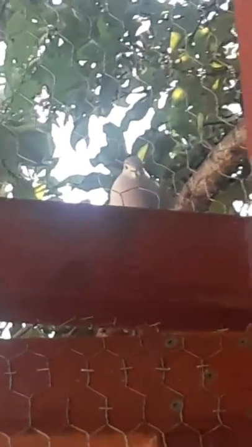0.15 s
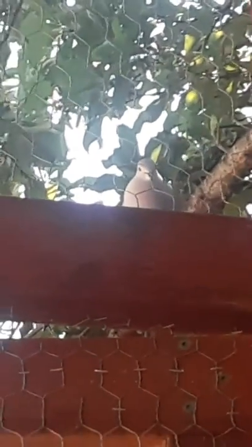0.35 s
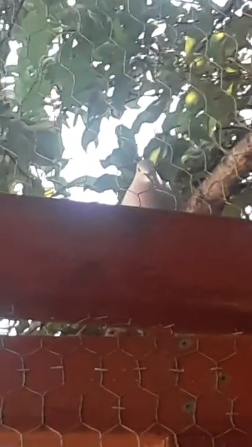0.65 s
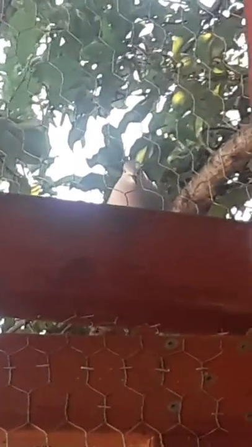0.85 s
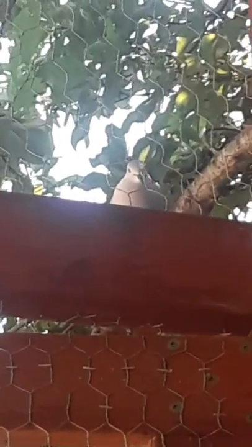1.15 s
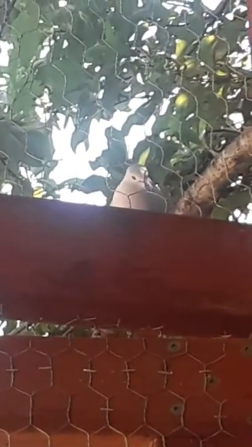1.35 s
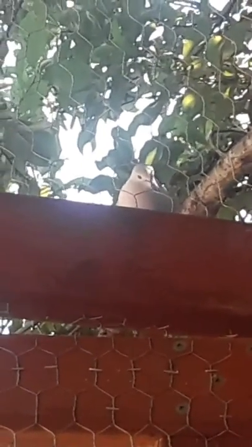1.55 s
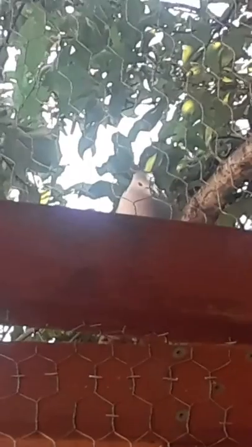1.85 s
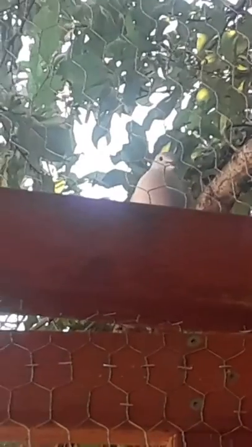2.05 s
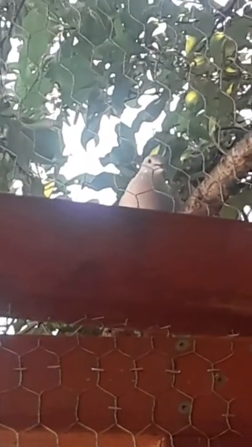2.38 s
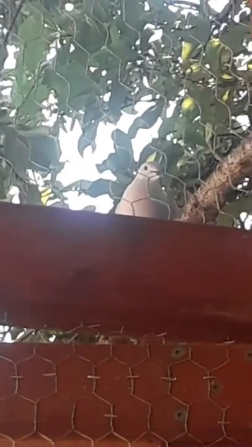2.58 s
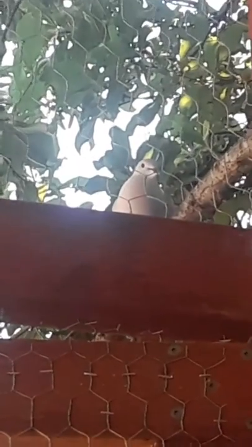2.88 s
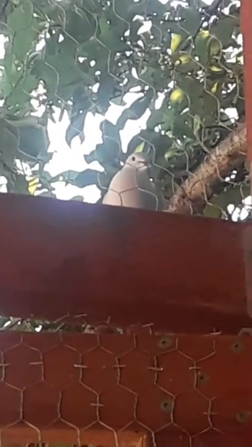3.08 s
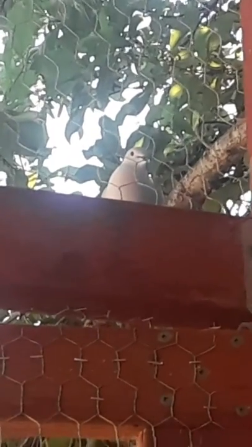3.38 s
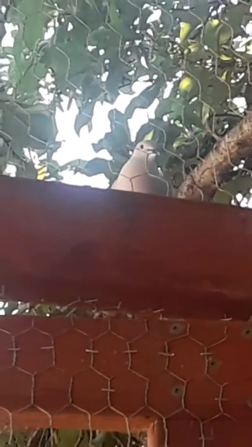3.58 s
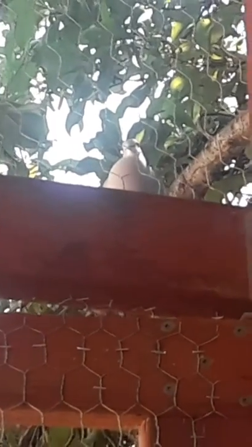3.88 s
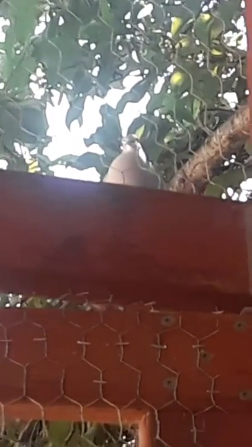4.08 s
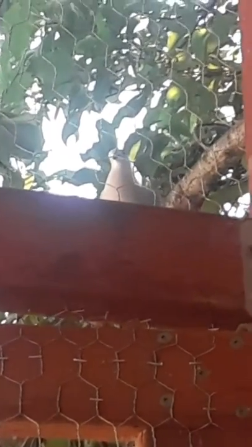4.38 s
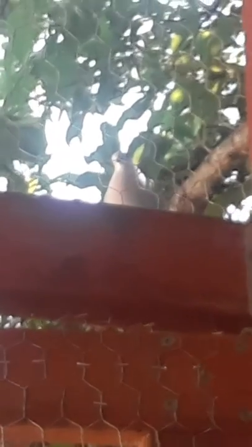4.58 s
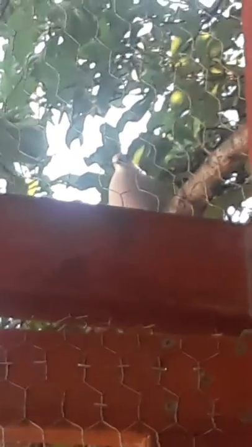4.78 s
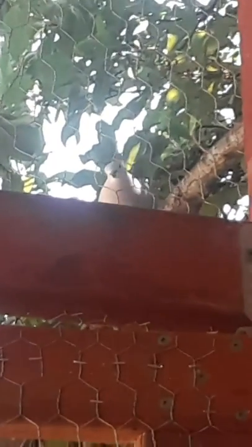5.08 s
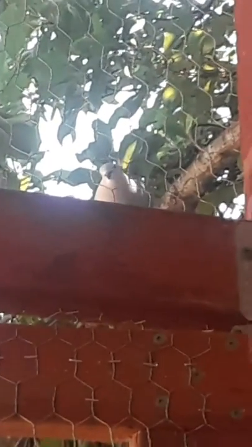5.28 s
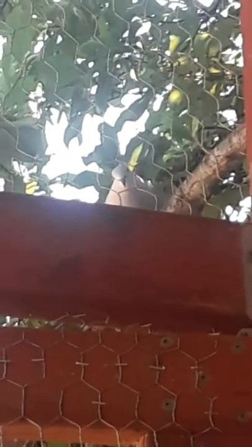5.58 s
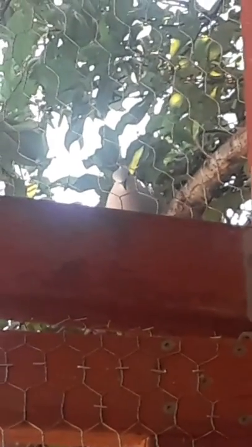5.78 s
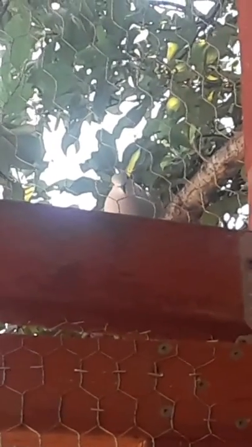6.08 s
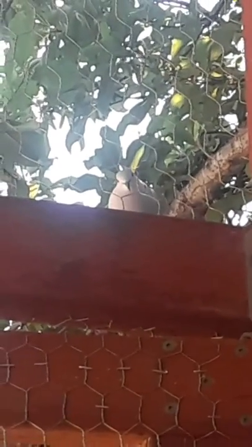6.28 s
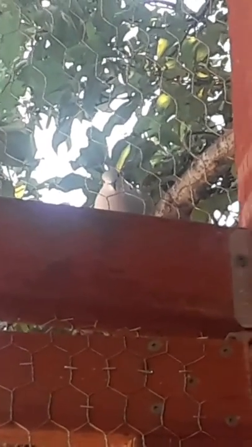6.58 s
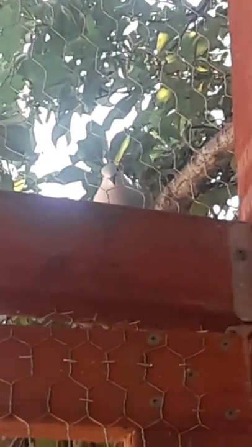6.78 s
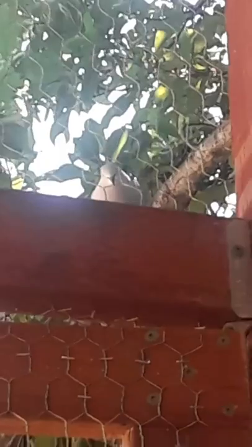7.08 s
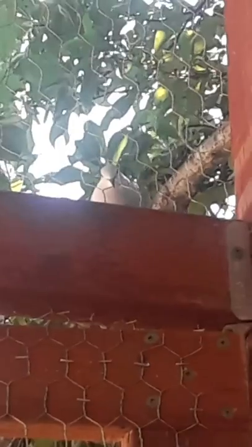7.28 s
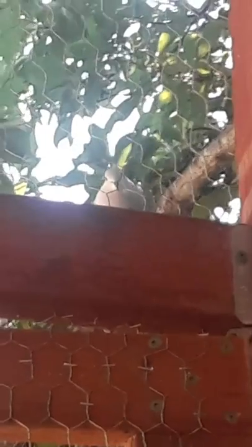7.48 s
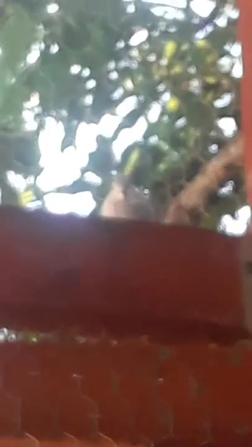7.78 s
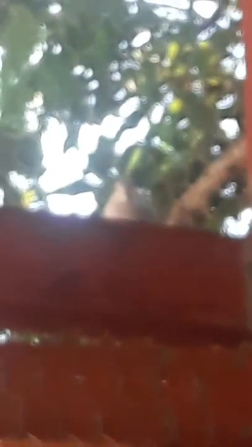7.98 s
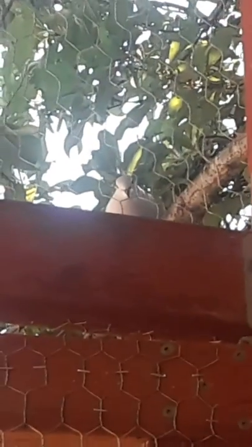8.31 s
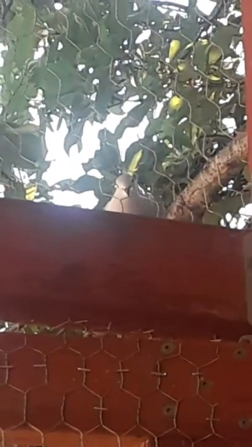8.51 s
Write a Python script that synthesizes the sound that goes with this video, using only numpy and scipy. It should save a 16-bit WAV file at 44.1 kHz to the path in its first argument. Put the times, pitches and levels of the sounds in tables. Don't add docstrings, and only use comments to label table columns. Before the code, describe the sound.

Outdoor yard, stereo microphones close to a perched dove. Its mellow coos dominate, almost flute-smooth, at a steady low pitch. Between the first and second full phrases, thin bird slides, hoarse chirps and far peeps cluster with crisp leaf cracks and a small wood knock. Later it is calmer, with only faint chirps and a soft scuff around the final phrase, over far traffic and faint hiss.

```python
import sys
import numpy as np
from scipy import signal
from scipy.fft import rfft, irfft, next_fast_len
from scipy.io import wavfile
from scipy.ndimage import uniform_filter1d

SR = 44100
rng = np.random.default_rng(int(sys.argv[2]) if len(sys.argv) > 2 else 0)


def boost(x):
    u = np.asarray(x, float) / 20
    return 10 ** u


def unload_wav(signal):
    wavfile.write(
        sys.argv[1],
        SR,
        np.round(np.clip(np.atleast_2d(signal).T, -1, 1) * 32767).astype(np.int16),
    )


N = 381465

# frequency in Hz, density in dB per Hz.
LEAF_COLOUR = [(700, -42.5), (1500, -21.5), (2600, -10), (3600, -11), (5100, -9), (6200, -5), (7600, -2.5),
               (8500, -7), (9800, -17), (12500, -9), (15900, -7.5)]
# start in seconds, peak in dB, ring in Hz, low knock in dB relative.
LEAF_SNAPS = [(1.712, -53.5, 7320, 5), (1.7792, -42.5, 5230, -23), (1.8737, -32, 7240, -28),
              (2.0076, -49, 4700, -14.5), (2.163, -43, 5620, 0), (2.386, -55, 6105, 0),
              (2.4185, -57, 7570, 0), (1.8594, -45, 7600, -20), (2.272, -57, 7000, -10),
              (3.476, -52, 6200, -20), (3.657, -48, 6500, -20), (3.685, -50, 7000, -20),
              (3.7102, -51, 7380, -20), (4.9289, -58, 6230, -20), (3.525, -43, 7000, -20),
              (3.552, -42, 5000, -20), (3.482, -39, 7170, -32), (3.5169, -35, 8500, -31),
              (3.5355, -30, 6420, -8.5), (3.5712, -39, 7450, -6.5), (3.7257, -42, 6830, -22),
              (3.7531, -47, 8340, -22), (3.7668, -51, 7820, -16), (3.7986, -42, 6700, -41),
              (3.8387, -44, 7470, -8), (3.8675, -45, 7010, 8), (4.047, -53, 5870, 7),
              (4.141, -63, 7300, 19), (4.2161, -44, 7670, -18), (4.2883, -39, 13120, -25),
              (4.3332, -56, 14000, -15), (4.2176, -47, 13500, -25), (4.4125, -51.5, 8110, -19),
              (4.8515, -48, 5740, -9), (4.9444, -48, 7600, -18), (3.6459, -44, 7400, -15),
              (3.74, -53, 7800, -20), (4.182, -53, 7900, -20), (4.765, -53, 7500, -20),
              (4.802, -51, 7600, -20), (3.487, -39, 5500, -16), (3.733, -52, 6500, -20),
              (4.262, -52, 7420, -20), (4.7264, -51, 7520, -20), (4.7973, -51, 7100, -20)]
# start and length in seconds, level in dB, pitch in Hz,
# trailing murmur in seconds.
OPENERS = [
    (.904, .182, -19.5, 483.5, .02),
    (5.561, .172, -21.3, 486, .022),
    (7.129, .163, -20.3, 484, .025),
]
HELD = [
    (-.33, .44, -21, 471, .045),
    (1.2, .433, -19.8, 472.5, .058),
    (5.862, .424, -20.5, 477, .025),
    (7.406, .462, -20.8, 469.5, .05),
]
CLOSERS = [
    (.35, .102, -20, 474.6, .028),
    (1.89, .103, -20, 474.5, .028),
    (6.533, .115, -20, 476.7, .035),
    (8.119, .102, -20.5, 471.3, .028),
]
LEAD_S = 0.04


def evened(x):
    return x / np.sqrt(np.mean(x ** 2) + 1e-20)


def read(points, hz):
    f, value = np.transpose(points)
    return np.interp(np.log(hz + 1), np.log(f + 1), value)


def coloured(x, points):
    count = next_fast_len(len(x) + len(x) % 2, True)
    gain = boost(read(points, np.fft.rfftfreq(count, 1 / SR)))
    return irfft(rfft(x, count) * gain, count)[:len(x)]


def add(mix, s, sound):
    first = round(s * SR)
    part, sound = mix[max(first, 0):], sound[max(-first, 0):]
    part[:len(sound)] += sound[:len(part)]


def wander(count, ms):
    span = max(int(ms * SR / 1000), 1)
    once = uniform_filter1d(rng.standard_normal(count), span)
    return evened(uniform_filter1d(once, span))


def fuzzy(hz, width_hz):
    r = np.exp(-np.pi * width_hz / SR)
    z = rng.standard_normal(len(hz)) + 1j * rng.standard_normal(len(hz))
    z = signal.lfilter([1], [1, -2 * r, r * r], z)
    return evened((z * np.exp(2j * np.pi * np.cumsum(hz) / SR)).real)


def edges(count, ms):
    return signal.windows.tukey(count, min(2 * ms * SR / 1000 / count, 1))


def eased(u):
    return np.sin(np.pi / 2 * np.clip(u, 0, 1)) ** 1.3


def yard():
    # frequency in Hz, density in dB per Hz.
    hum_colour = [(15, -59), (25, -25.5), (90, -1.5), (262, -4), (342, -7), (466, -5.5), (582, -7),
                  (636, -7), (1160, -10.5), (1580, -17.5), (1970, -21), (2810, -28), (5000, -41),
                  (6500, -67.5), (11000, -120)]
    # frequency in Hz, share in common from 0 to 1.
    likeness = [(40, .999), (150, .995), (700, .99), (2000, .96), (5000, .93)]
    # peak in seconds, half width in seconds, gain in dB.
    hum_swells = [(.15, .3, 3), (1.4, 0.65, 4), (3.9, .5, 2.5), (5.9, .45, 3.5), (7.7, 0.58, 4.5)]
    frames, hz = N // 256 + 5, np.fft.rfftfreq(1024, 1 / SR)
    a, b, c, d, patches = rng.standard_normal((frames, 513, 5)).T
    patches = evened(uniform_filter1d(uniform_filter1d(patches, 12, 0), 14, 1))
    t = np.arange(frames) * 256 / SR
    swell = sum(db * np.exp(-((t - s) / width) ** 2) for s, width, db in hum_swells)
    same = np.clip(read(likeness, hz), -1, 1)[:, None]
    left = a + 1j * b
    right = same * left + np.sqrt(1 - same ** 2) * (c + 1j * d)
    z = np.array([left, right]) * boost(read(hum_colour, hz)[:, None] + 1.1 * patches + swell)
    return boost(-56) * evened(signal.istft(z, nperseg=1024, noverlap=768)[1][:, :N])


def echoes(x, t60, scatter_db):
    # delay in seconds, level in dB.
    walls = [
        (.035, -30),
        (.094, -27.5),
        (.135, -38),
    ]
    count = SR // 2
    t = np.arange(count) / SR
    sparse = rng.choice([-1., 1.], count) * (rng.random(count) < 1500 / SR)
    tail = sparse * boost(-60 * t / t60) * (t > .012)
    other = rng.standard_normal((2, count)) * np.abs(tail)
    taps = boost(scatter_db) * (tail + .4 * other) / np.linalg.norm(tail)
    for delay, db in walls:
        taps[:, int(delay * SR)] += boost(db)
    return signal.oaconvolve(x[None], taps, axes=1)[:, :N]


def scuffs():
    # start and length in seconds, top in Hz, level in dB.
    rubs = [ (3.866, 0.03, 3000, -47), (3.865, .03, 900, -48), (1.9, .15, 750, -57),
            (4.038, 0.09, 4500, -56), (6.268, 0.2, 6580, -66.5), (7.527, 0.039, 6000, -60.5),
            (7.549, 0.035, 5500, -51), (7.561, 0.1, 5030, -59.5), (8.121, 0.27, 4300, -63), ]
    # start in seconds, peak in dB, pitch in Hz, decay in seconds.
    s, db, hz, decay = (3.8662, -31, 750, .0022)
    out = np.zeros(N)
    t = np.arange(1800) / SR
    add(out, s, boost(db) * np.exp(-t / decay) * np.sin(2 * np.pi * hz * t))
    for s, length, top_hz, db in rubs:
        dull = [(.05 * top_hz, -12), (.25 * top_hz, 0), (.8 * top_hz, -8), (1.8 * top_hz, -35)]
        noise = evened(coloured(rng.standard_normal(int(length * SR)), dull))
        u = np.linspace(0, 5, len(noise))
        add(out, s, boost(db) * noise * np.e * u * np.exp(-u) * edges(len(noise), ms=0.95))
    return out


def snaps():
    out, ticks = np.zeros((2, N))
    t = np.arange(1800) / SR
    for s, db, ring_hz, knock_db in LEAF_SNAPS:
        add(ticks, s, boost(db + 14) * np.ones(1))
        add(out, s, boost(db - 3) * np.exp(-t / .0006) * np.sin(2 * np.pi * ring_hz * t))
        knock = fuzzy(np.full(len(t), 1600), width_hz=1200)
        add(out, s, boost(db + knock_db - 10.5) * np.exp(-t / 0.01) * knock)
    return out + coloured(ticks, LEAF_COLOUR)


def stirring():
    # peak in seconds, rise and fall in seconds (20 dB each), level in dB.
    stirs = [ (1.72, .01, .06, -61), (1.778, .03, .07, -66), (1.866, .012, .07, -57), (1.92, .04, .16, -72),
             (2.162, .007, .08, -66), (2.2, .03, .3, -77), (2.388, .008, .1, -71),
             (3.482, 0.0097, 0.18, -63), (3.58, .095, 0.051, -50), (3.64, .06, .12, -66),
             (3.8, .12, 0.04, -63), (3.872, .008, .1, -63), (4.058, .06, .09, -67), (4.15, .02, .2, -72),
             (4.37, .1, .1, -79), (4.56, .2, .3, -84), (4.222, .08, .055, -64.5), (4.262, .015, 0.09, -69),
             (4.414, .012, .07, -64), (4.47, .06, .04, -68), (4.74, .03, .12, -65),
             (4.805, .07, 0.027, -64), (4.854, .05, 0.09, -66), (4.942, 0.03, .03, -69),
             (4.97, .02, .4, -78), ]
    stir = np.zeros(N)
    for s, rise, fall, db in stirs:
        t = np.arange(-rise, 2 * fall, 1 / SR)
        add(stir, s - rise, boost(db - 20 * np.maximum(-t / rise, t / fall)))
    t = np.arange(1800) / SR
    for s, db, _, _ in LEAF_SNAPS:
        add(stir, s, boost(db - 38) * np.exp(-t / .008))
    return stir


def crackle():
    size = boost(2.1 * np.minimum(rng.exponential(1, N), 4))
    cracks = rng.standard_normal(N) * size * (rng.random(N) < 2500 / SR)
    cracks = evened(cracks) + 1.4 * rng.standard_normal(N)
    cracks = evened(coloured(cracks, LEAF_COLOUR))
    clumped = np.zeros(N)
    for side in "high", "low":
        split = signal.butter(4, 9800, side, fs=SR, output="sos")
        clumped += signal.sosfilt(split, cracks) * boost(1.8 * wander(N, ms=6.))
    return clumped


def leaves():
    return snaps() + scuffs() + boost(3.7) * crackle() * stirring()


def whistles():
    # start and length in seconds, start and end pitch in Hz, level in dB.
    even_slides = [ (0., .17, 5615, 5575, -68.5), (.118, 0.08, 5050, 4980, -61),
                   (0.135, 0.05, 5370, 5260, -62), (.255, .3, 4850, 4215, -57), (.2, .07, 4900, 4860, -68),
                   (.168, .035, 4930, 4900, -57), (.14, .03, 5650, 5550, -67), (.03, .05, 4600, 4600, -74),
                   (3.015, .115, 3130, 2600, -59), (2.935, .045, 2850, 2560, -61),
                   (4.1, .055, 2260, 2240, -58), (4.115, .06, 1540, 1720, -64), (4.46, .1, 2330, 2290, -62),
                   (1.842, 0.055, 1860, 1890, -51.5), (1.89, .06, 1900, 1900, -61),
                   (3.548, .075, 1870, 1990, -48), (2.835, .175, 3870, 4020, -61),
                   (2.775, .068, 4080, 3830, -60), (2.908, .26, 5570, 4760, -63),
                   (4.44, 0.15, 3790, 3745, -73), (4.567, .065, 5080, 4450, -57.5),
                   (4.52, .04, 5120, 5060, -62), (7.095, .12, 5490, 5480, -65),
                   (7.16, .31, 5490, 5270, -63), (8.182, .18, 4080, 4040, -76), ]
    # start and length in seconds, start and end pitch in Hz, level in dB.
    swoops = [ (3.897, .04, 3600, 2380, -49), (3.887, .022, 3500, 3480, -47), (4.5, .035, 5650, 5120, -66),
              (4.825, .13, 3100, 4900, -70), (4.82, .05, 5500, 5750, -68), (7.095, .06, 4650, 4150, -65),
              (7.14, .33, 4170, 3800, -69), (3.812, .04, 3100, 2350, -57), (3.772, .014, 3000, 2900, -58), ]
    out = np.zeros(N)
    for calls, settle in (even_slides, 1.1), (swoops, 3.2):
        for s, length, from_hz, to_hz, db in calls:
            u = np.linspace(0, 1, int(length * SR))
            hz = from_hz + (to_hz - from_hz) * (1 - np.exp(-settle * u)) / (1 - np.exp(-settle))
            swell = (.12 + .88 * eased(u / 0.4)) * boost(db - 9 * u ** 2)
            tone = np.sqrt(2) * np.sin(2 * np.pi * np.cumsum(hz) / SR) + 0.25 * fuzzy(hz, 220)
            flutter = boost(1.6 * wander(len(hz), ms=9.))
            add(out, s, swell * flutter * tone * edges(len(hz), ms=5.))
    return out


def arched_whistle():
    # time in seconds, pitch in Hz, level in dB.
    course = [(4.835, 2633, -68), (4.897, 3372, -51), (4.999, 3701, -72), (5.041, 3916, -54),
              (5.073, 3910, -50), (5.101, 3752, -59), (5.127, 3389, -62), (5.169, 3237, -60),
              (5.25, 3172, -80)]
    s, hz, db = np.transpose(course)
    t = np.arange(s[0], s[-1], 1 / SR)
    hz = uniform_filter1d(np.interp(t, s, hz), size=1100)
    tone = np.sqrt(2) * np.sin(2 * np.pi * np.cumsum(hz) / SR) + .3 * fuzzy(hz, 200)
    return s[0], tone * boost(np.interp(t, s, db) - .5 + 2.0 * wander(len(t), ms=9.))


def chirps():
    # start
    # and length in seconds, start and end pitch in Hz, level in dB.
    tweets = [ (2.77, .1, 4350, 3930, -64), (2.83, 0.042, 2650, 2570, -60), (2.916, 0.09, 2930, 2540, -61),
              (3.015, .12, 3200, 2700, -65), (4.86, .12, 3000, 3650, -60), (3.268, 0.09, 3600, 3550, -62),
              (3.252, .1, 4150, 4200, -67), (3.292, .03, 4900, 4600, -68), (4.835, .09, 2230, 2330, -52),
              (3.457, .11, 1575, 1920, -61.5), (3.538, 0.083, 1822, 2010, -52),
              (3.645, .055, 5600, 3900, -64), (3.782, .03, 6150, 6100, -64), (3.76, 0.016, 3400, 3550, -56),
              (3.805, 0.03, 3400, 3000, -61), (5.57, 0.17, 4100, 3870, -84),
              (7.44, 0.19, 2806, 2790, -72.5), (6.55, .4, 2800, 2780, -82), ]
    chatter = [ (.23, .04, 5400, 5550, -70), (2.165, 0.02, 2040, 1870, -53), (2.842, .053, 2100, 2055, -65),
               (3.012, .03, 3350, 3250, -63), (3.85, .14, 1850, 1820, -59), (4.125, .08, 2150, 1750, -58),
               (4.2, .14, 1780, 2150, -62), (4.46, .12, 2150, 1890, -62), (3.75, .06, 2100, 1800, -64),
               (4.613, .13, 1930, 1870, -61), (4.81, 0.037, 2580, 3400, -53.5),
               (4.9, .24, 1960, 1830, -58.5), (7.547, 0.025, 1987, 1980, -49),
               (7.549, .022, 2900, 2900, -57), (7.549, .022, 4200, 4200, -61), ]
    rasps = [ (.12, .14, 5200, 5200, -70), (7.06, .05, 4500, 4500, -73), (.19, .03, 5970, 6300, -66),
             (1.094, .14, 2900, 2440, -64), (3.29, .09, 4300, 4200, -66.5), (3.49, .16, 2800, 2700, -61),
             (3.68, .07, 4590, 4500, -67), (3.872, .065, 3300, 3200, -56), (3.262, .04, 3650, 3650, -57),
             (3.11, .09, 2600, 2450, -63), (4.14, .1, 2600, 2400, -66), (4.58, .1, 4950, 4600, -67),
             (2.92, .06, 3300, 3000, -66), (3.8, .2, 3000, 2700, -63), (4.72, .07, 3300, 3200, -70),
             (4.8, .14, 3300, 4300, -66), (4.16, .1, 3500, 3900, -70), (3.5, .13, 2300, 2300, -60),
             (3.96, .14, 2900, 2700, -67), (8.14, .12, 2694, 2700, -73), ]
    # start and length in seconds, level in dB.
    far_peeps = [ (.866, 0.084, -60), (0.965, 0.076, -56.5), (1.098, 0.067, -58), (1.22, 0.1, -69),
                 (1.32, 0.09, -68), (1.585, 0.11, -69), (1.73, 0.07, -66), (1.8, .05, -69),
                 (1.86, 0.13, -69), (2.166, 0.055, -65), (2.278, 0.096, -73), (2.483, 0.098, -67.5),
                 (2.603, 0.067, -67), (3.106, 0.089, -63), (3.217, 0.072, -58.5), (3.327, 0.073, -58.5),
                 (3.434, 0.062, -56.5), (3.703, 0.05, -52), (3.832, 0.05, -51), (3.918, 0.075, -52),
                 (4.075, 0.04, -63), (4.442, 0.089, -61), (4.586, 0.04, -67), ]
    peep_hz = 2345
    peeps = [(s, length, 1.02 * peep_hz, .99 * peep_hz, db) for s, length, db in far_peeps]
    out = np.zeros(N)
    for calls, width_hz in (tweets, 180), (chatter, 280), (rasps, 650), (peeps, 95):
        for s, length, from_hz, to_hz, db in calls:
            hz = np.linspace(from_hz, to_hz, int(length * SR))
            fade_db = -6 * np.linspace(-.5, .5, len(hz))
            level = boost(db + fade_db + 1.2 * wander(len(hz), ms=7.))
            add(out, s, level * fuzzy(hz, width_hz) * edges(len(hz), ms=20.))
    return out


def songbirds():
    out = whistles() + chirps()
    add(out, *arched_whistle())
    return out


def effort(note, shape):
    length, db, top_hz, trail = note
    rise, fall, droop, scoop_hz, scoop_s, sag_hz, murmur_db, lead, wane_db, sag_power = shape
    t = np.arange(-LEAD_S, length + trail, 1 / SR)
    inside = np.clip(t, 0, length)
    before = np.maximum(-t, 0) / lead
    after = np.maximum(t - length, 0) / trail
    late = (inside / length) ** 2.6
    closing = eased((length - t) / fall)
    hz = top_hz - scoop_hz * np.exp(-inside / scoop_s) - sag_hz * (inside / length) ** sag_power
    hz = hz - 95 * after - 70 * np.minimum(before, 1)
    hz = hz - 22 * (1 - closing)
    body = eased(t / rise) * closing * (1 - droop * late)
    body = body * boost(wane_db * eased((t - length + 3.2 * trail) / .08))
    lead_db = -21
    murmur = boost(lead_db + (murmur_db - lead_db) * late ** 2 - 16 * (after + before))
    return hz, boost(db) * (body + murmur * eased((t + lead * 1) / .004))


def coos():
    # rise and fall in seconds, droop share, scoop in Hz
    # and seconds, sag in Hz, murmur in dB, lead-in in seconds, wane in dB, sag power.
    opener_shape = (.074, .036, -.2, 72, .026, 19, -27, .024, -.4, 2.6)
    held_shape = (.052, .038, .45, 45, .014, 20, -17, .013, -3, 4.5)
    closer_shape = (.034, .05, .2, 70, 0.009, 22, -21, .015, -.6, 2.6)
    # multiple of the pitch, level in dB.
    overtones = [(2, -48.5), (3, -58)]
    out = np.zeros(N)
    for notes, shape in (OPENERS, opener_shape), (HELD, held_shape), (CLOSERS, closer_shape):
        for s, *note in notes:
            hz, level = effort(note, shape)
            turns = 2 * np.pi * np.cumsum(hz * (1 + .002 * wander(len(hz), ms=2.7))) / SR
            turns = turns - turns[max(round((LEAD_S - s) * SR), 0)]
            upper = sum(boost(db) * np.cos(k * turns) for k, db in overtones)
            tone = np.cos(turns) + boost(14 * (1 - level / level.max())) * upper
            tone = np.sqrt(2) * tone + boost(-32.5) * fuzzy(hz + 60, 150)
            unsteady = level * boost(.25 * wander(len(hz), ms=8.))
            add(out, s - LEAD_S, unsteady * tone * edges(len(hz), ms=4.))
    return out


def breaths():
    # start and length in seconds, start and end pitch in Hz, level in dB.
    leaks = [
        (5.495, .075, 460, 560, -52),
        (7.085, .04, 490, 470, -53),
        (5.845, .025, 560, 520, -52),
    ]
    # seconds after the note, length in seconds, start and end pitch in Hz, width in Hz,
    # level in dB relative to the note.
    after, span, gasp_from_hz, gasp_to_hz, width_hz, gasp_db = (.008, .05, 480, 450, 70, -31)
    out = np.zeros(N)
    for s, length, db, *_ in OPENERS + HELD + CLOSERS:
        gasp = fuzzy(np.linspace(gasp_from_hz, gasp_to_hz, int(span * SR)), width_hz)
        add(out, s + length + after, boost(db + gasp_db) * gasp * edges(len(gasp), ms=12.))
    for s, length, from_hz, to_hz, db in leaks:
        puff = fuzzy(np.linspace(from_hz, to_hz, int(length * SR)), 80)
        add(out, s, boost(db) * puff * edges(len(puff), ms=10.5))
    return out


def dove():
    return coos() + breaths()


def scene():
    coo, small = dove(), songbirds()
    near = small + leaves()
    apart = .17 * (np.roll(near, 9) - np.roll(near, 23)) / np.sqrt(2)
    near = np.array([near + apart, near - apart]) * boost(np.array([[-.3], [.3]]))
    back = echoes(coo, t60=.45, scatter_db=-34) + echoes(small, t60=.35, scatter_db=-12)
    return coo * boost(np.array([[.35], [-.35]])) + near + back + yard()


def band_limit(x):
    return signal.sosfilt(signal.butter(12, 15810, fs=SR, output="sos"), x)


def record(dry):
    # frequency in Hz, density in dB per Hz.
    hiss_colour = [(2000, -5), (5000, -2), (9500, -5), (12500, -5.5), (15500, -0.5)]
    shared, left, right = (evened(coloured(v, hiss_colour)) for v in rng.standard_normal((3, N)))
    hiss = boost(-72.5) * (shared + .38 * np.array([left, right]))
    rumble_cut = signal.butter(2, 42, "high", fs=SR, output="sos")
    top_cut = signal.firwin(511, 15750, window=("kaiser", 9), fs=SR)
    heard = signal.oaconvolve(signal.sosfilt(rumble_cut, dry + hiss), top_cut[None], "same")
    return band_limit(heard)


dry = scene()
out = record(dry)
unload_wav(out)
```